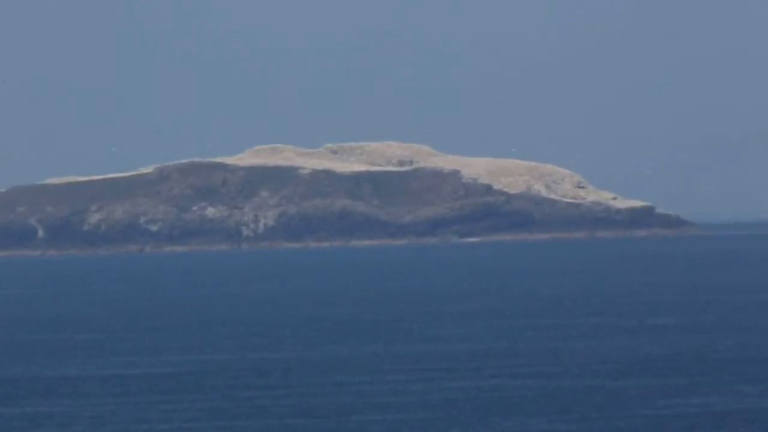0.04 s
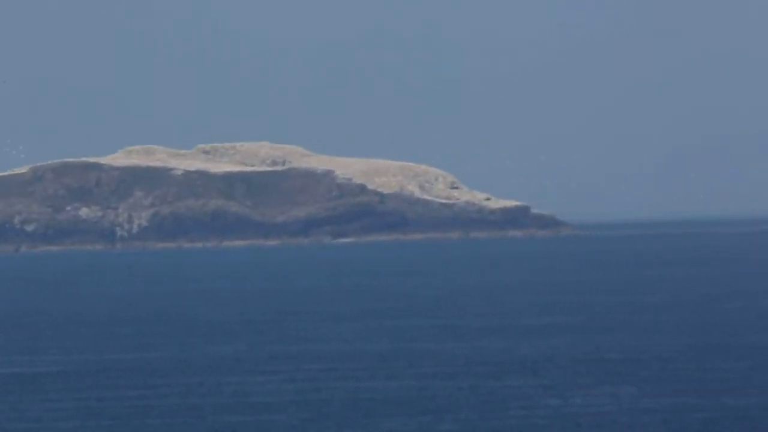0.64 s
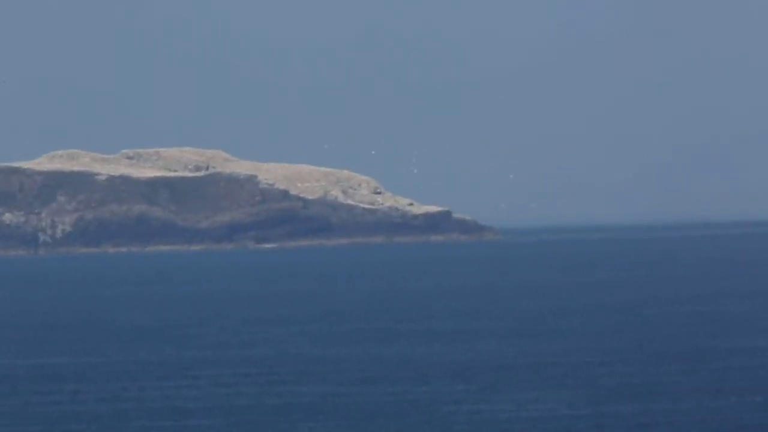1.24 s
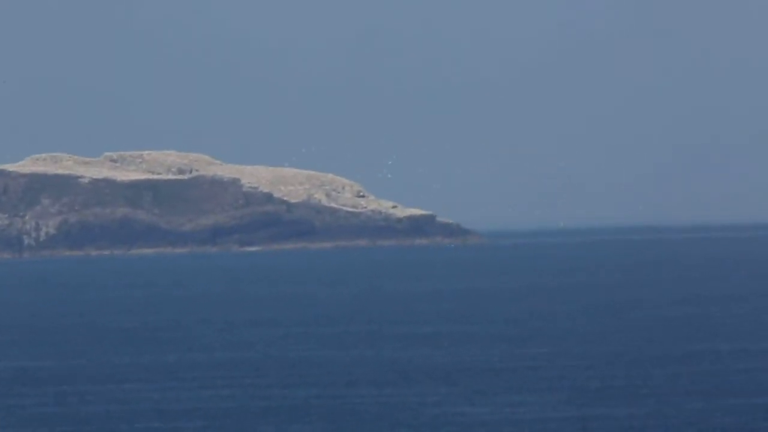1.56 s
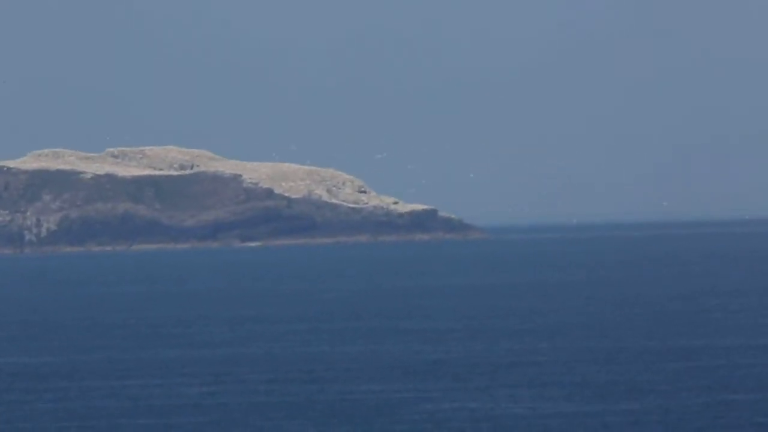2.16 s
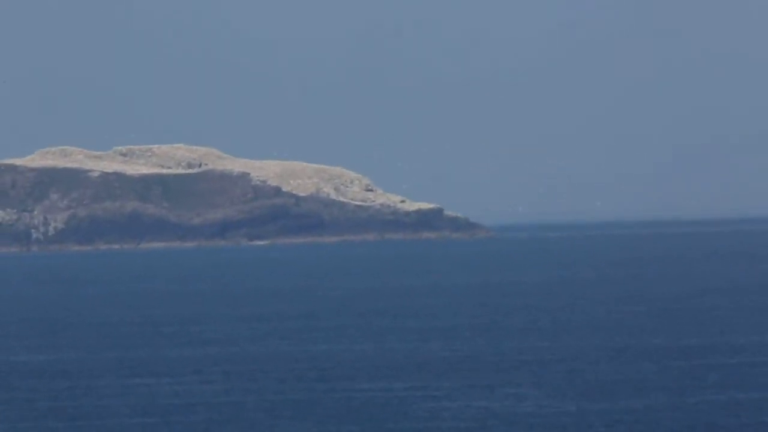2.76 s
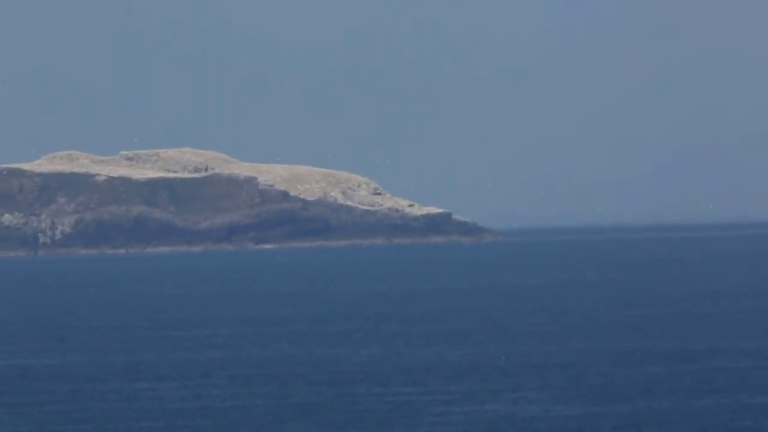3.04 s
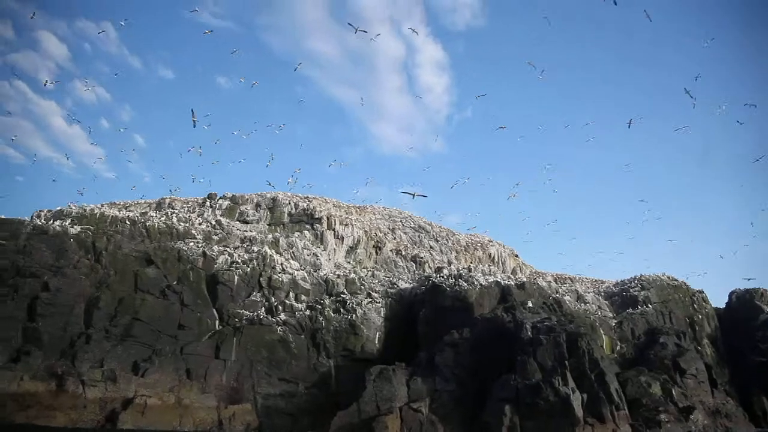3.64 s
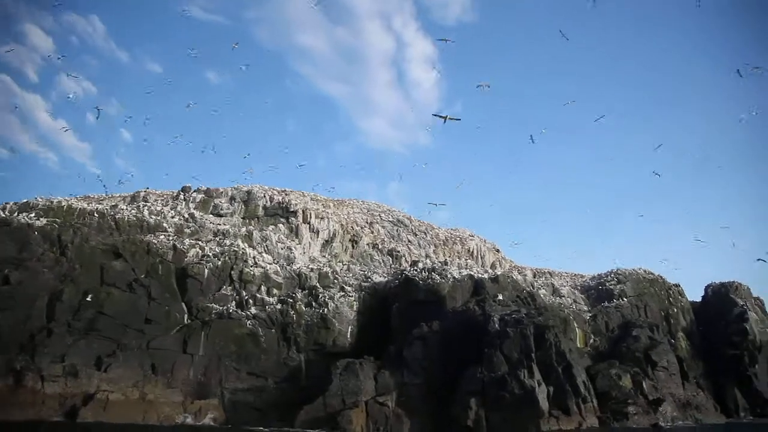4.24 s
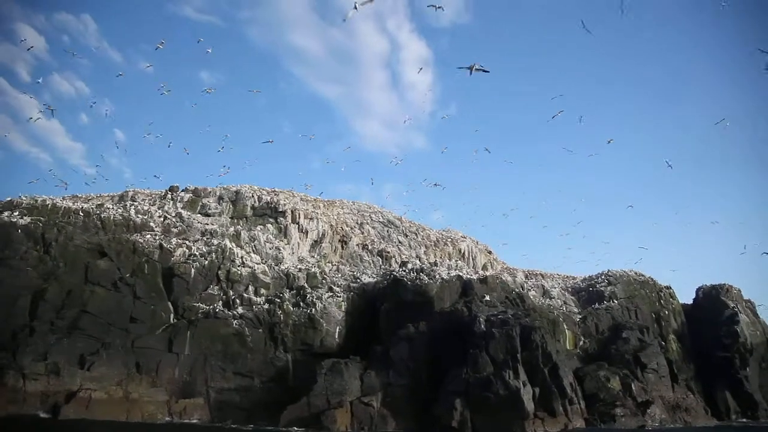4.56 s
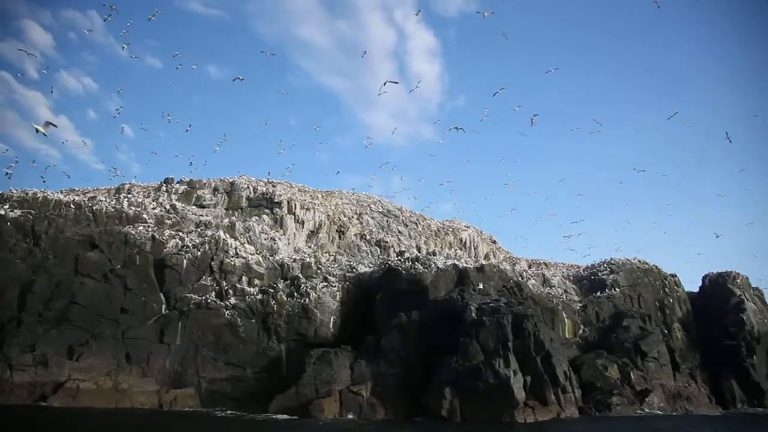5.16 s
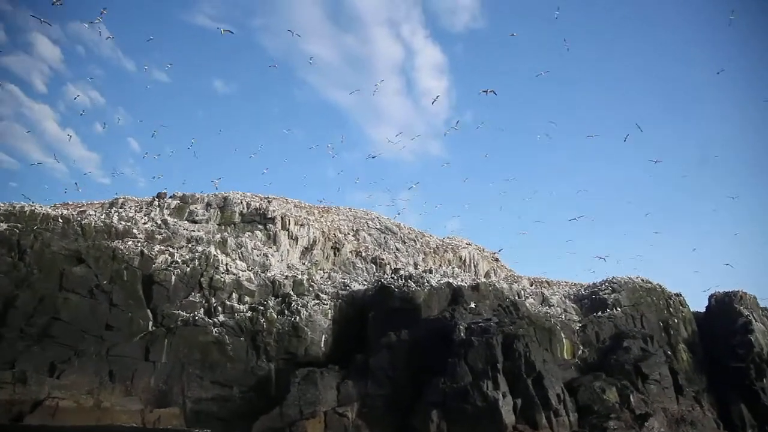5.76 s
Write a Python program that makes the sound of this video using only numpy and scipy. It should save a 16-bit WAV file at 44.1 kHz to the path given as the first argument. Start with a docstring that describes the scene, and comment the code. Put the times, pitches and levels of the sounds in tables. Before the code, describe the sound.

Wind buffets the microphone over distant sea, gulls and a songbird, then waves slap a boat beneath a cackling gannet colony.

```python
"""A gannet island, heard in mono from two places. On a quiet clifftop, gusts thump the microphone
over the far sea, a fading chorus of gulls and a small whistling songbird. After a short silence we
are in a boat under the colony. Waves boom on the hull, trapped air glugs, bubbles ring and foam
fizzes. Above it all a crowd of gannets cackles, each call a rattle of pulses ringing in a throat."""
import sys
import numpy as np
from scipy import signal
from scipy.fft import rfft, irfft, next_fast_len
from scipy.io import wavfile
from scipy.ndimage import uniform_filter1d

SR = 44100
rng = np.random.default_rng(int(sys.argv[2]) if len(sys.argv) > 2 else 0)


def output_pcm(signal):
    """Save a mono or channel-first signal as 16-bit PCM at the path in sys.argv[1].

    Samples are clipped to [-1, 1] before scaling.
    """
    pcm = np.clip(np.atleast_2d(signal).T, -1, 1) * 32767
    wavfile.write(sys.argv[1], SR, np.round(pcm).astype(np.int16))


N = 255339
TIME = np.arange(N) / SR
CLIFF_END_S, BOAT_START_S = 3.274, 3.352

# Levels in a table compare its rows; the functions may turn the whole layer up or down.
# Tone colours on the clifftop, from low to high: frequency_hz, level_db
FAR_SEA_SPECTRUM = [(20, -9), (52, 4), (85, -10.5), (150, -15.5), (370, -14), (560, -16.5), (700, -19.5),
                    (1200, -22.5), (1700, -25.5), (2100, -29), (5000, -32.5), (10000, -36), (15500, -41)]
RUSTLE_SPECTRUM = [(500, -2), (1700, 0), (3000, -8), (6000, -11), (11000, -24)]
WIND_SPECTRUM = [(20, -9), (45, 2), (75, 6.5), (165, -4), (230, -13.5), (300, -34), (400, -30), (500, -42),
                 (1000, -64)]
FLUTTER_SPECTRUM = [(180, -10), (250, -4), (310, -0.5), (380, -4), (470, -21), (800, -23.5), (1500, -46)]
# A faint, far tone: pitch_hz, width_hz, level_db
FAR_TONE = (1462, 45, -72.5)
# Soft rustles: start_s, length_s, level_db
RUSTLES = [(2.79, .13, -63), (2.98, .015, -62), (3.066, .02, -60)]
# How the gull chorus fades: time_s, level_db
CHORUS_LEVEL = [(0, -57), (.25, -55.5), (.6, -58.5), (1, -62), (1.4, -65), (1.9, -79.5), (3.27, -76)]
# Where the gulls' throats ring: pitch_hz, width_hz, level_db
GULL_THROATS = [(570, 170, -2.5), (1073, 380, 1), (1270, 200, -7), (1740, 260, -1), (2590, 100, -13)]
# The overtones of a gull's cry: pitch_multiple, level_db
GULL_HARMONICS = [(2, -4), (3, 0.5), (4, -16)]
# Single bending calls: start_s, length_s, start_hz, middle_hz, end_hz, level_db
GULL_CRIES = [(2.392, .1, 535, 615, 662, -62.5), (2.445, .1, 535, 584, 525, -62.5)]
YELPS = [(.17, 0.085, 1810, 1890, 1880, -58), (.58, 0.03, 2430, 2530, 2480, -62),
         (1.038, .035, 2280, 2460, 2330, -69)]
WHISTLES = [(0, .028, 4380, 4000, 4020, -62), (.06, .04, 4340, 4140, 4600, -62),
            (.137, .026, 7850, 7480, 7700, -60), (.162, .024, 7700, 8000, 8300, -73),
            (.315, 0.092, 5000, 4400, 4200, -62), (.42, .08, 4270, 4330, 4310, -78),
            (1.842, .055, 7150, 6800, 6970, -69), (1.895, .06, 7050, 7280, 7420, -75),
            (1.98, .07, 7500, 7620, 7700, -75)]
# Songbird trills: start_s, note_count, spacing_s, note_length_s, start_hz, middle_hz, end_hz, level_db
TRILLS = [(.54, 11, .0298, .009, 6700, 5700, 4900, -65.5), (.99, 8, .0305, .009, 6800, 5900, 5100, -67),
          (1.325, 8, .0607, .016, 5150, 5450, 5850, -66), (1.337, 8, .0607, .02, 5900, 5250, 4400, -63)]
# Gusts, rising and falling by 20 dB: peak_s, level_db, rise_s, fall_s
GUSTS = [(.02, -33, 0.041, 0.051), (.18, -38, 0.097, 0.25), (.44, -25, 0.19, 0.29),
         (1.19, -28, 0.091, 0.12), (1.35, -37.5, .07, 0.062), (1.62, -34.5, 0.063, 0.11),
         (2.11, -39.5, 0.075, 0.09), (2.24, -33, 0.089, 0.086), (2.46, -48.5, 0.073, 0.12)]
# Small swirls of air that thump the microphone: peak_s, level_db, pitch_hz
EDDIES = [(.168, -22.5, 127), (0.203, -20.5, 125), (.361, -20.5, 115), (0.418, -11, 153), (.461, -15, 217),
          (0.51, -23, 322), (0.521, -18.5, 189), (0.55, -30.5, 452), (.558, -19.5, 133), (0.599, -24, 173),
          (0.7, -23.5, 100), (.77, -24, 180), (0.836, -27.5, 85), (.935, -31, 96), (1.12, -27.5, 105),
          (1.173, -18, 158), (1.179, -26, 298), (1.19, -14.5, 150), (1.226, -24, 118), (1.524, -35.5, 186),
          (1.611, -29.5, 163), (2.217, -21, 113), (2.284, -20.5, 156), (2.345, -31.5, 96),
          (2.639, -37.5, 105)]

# Tone colours at the boat: frequency_hz, level_db
HULL_SPECTRUM = [(25, -32), (45, 3.5), (70, -7), (100, -1), (170, -5), (260, -6), (400, -10), (900, -78)]
WASH_SPECTRUM = [(120, -66), (280, -1), (500, 0), (800, -0.5), (1300, -1), (2200, -4), (3300, -9),
                 (5000, -25), (9000, -53)]
FOAM_SPECTRUM = [(1200, -15), (2400, -0.5), (3400, -1), (5000, -2.5), (6600, -4), (7500, -10.5),
                 (8800, -24), (10500, -34.5), (15000, -40)]
SPRAY_SPECTRUM = [(5000, 1), (8000, 14), (10500, -1.5), (13000, -12), (15500, -20)]
SHOWER_SPECTRUM = [(7000, -6), (9500, 2), (12500, -1), (14000, -13), (15500, -17)]
COLONY_SPECTRUM = [(400, -15), (800, -10), (1200, -3), (1600, -0.5), (2300, -3.5), (3200, -6), (4500, -33),
                   (7000, -28)]
# Waves meeting the hull: peak_s, level_db, length_s
WAVES = [(3.626, -25.5, .15), (3.732, -26.5, 0.28), (3.823, -30, 0.22), (3.927, -24, 0.24),
         (4.17, -27.5, 0.21), (4.455, -30.5, 0.29), (4.705, -24.5, 0.21), (5.09, -30.5, 0.76),
         (5.395, -31, 0.78), (5.563, -23, 0.16), (5.78, -36, .15)]
# Where the hull rings: pitch_hz, width_hz, level_db
HULL_RESONANCES = [(87.3, 10.7, 6.5), (141, 30, 5), (210, 22, -1)]
# How loud the foam, the spray and the gannet crowd are as time passes: time_s, level_db
FOAM_LEVEL = [(3.37, -35), (3.56, -32.5), (3.69, -31.5), (3.77, -36), (3.84, -33), (3.94, -37.5),
              (4.14, -33.5), (4.55, -34.5), (4.7, -33), (5.25, -37), (5.54, -35.5), (5.59, -41.5),
              (5.67, -38), (5.79, -41.5)]
SPRAY_LEVEL = [(3.37, -74), (3.64, -60), (3.93, -72), (4.1, -58), (4.7, -54), (4.95, -52.5), (5.15, -56),
               (5.5, -53.5), (5.62, -60), (5.79, -57)]
COLONY_LEVEL = [(3.37, -30), (3.95, -35), (4.15, -32), (4.5, -30.5), (4.85, -31), (5.1, -28), (5.55, -29.5),
                (5.79, -41)]
# Showers of spray and small splashes: start_s, length_s, level_db
SHOWERS = [(4.02, 0.091, -60), (4.115, 0.084, -55), (4.18, 0.16, -59), (4.34, .11, -59), (4.55, .42, -65)]
SPLASHES = [(3.815, 0.018, -30), (4.556, 0.013, -28), (4.632, .018, -30.5), (4.673, 0.049, -30.5),
            (4.85, 0.016, -30.5), (4.907, 0.018, -27), (5.506, 0.018, -30)]
# A thin ring within the foam: start_s, length_s, pitch_hz, width_hz, level_db
FOAM_RING = (4.98, 2.5, 6100, 220, -42.5)
# Drops falling close by: start_s, level_db
DROPS = [(4.0245, -24), (4.0464, -28), (4.6699, -35), (4.9134, -34), (5.433, -25), (5.4621, -30)]
# Air pockets glugging at the hull: start_s, glide_s, start_hz, end_hz, level_db
GLUGS = [(3.625, 0.04, 165, 200, -18.5), (3.711, 0.032, 564, 660, -16), (3.721, 0.078, 144, 165, -16.5),
         (3.759, 0.034, 374, 487, -18.5), (3.823, 0.012, 90, 70, -15), (3.892, 0.026, 408, 290, -16),
         (3.898, 0.035, 205, 104, -15), (4.106, .055, 153, 144, -18), (4.703, 0.041, 217, 184, -16),
         (5.085, 0.071, 169, 140, -18), (5.55, 0.04, 240.5, 195, -13), (5.565, 0.083, 152.6, 127, -15)]
# Calls of the nearer gannets: start_s, length_s, pitch_hz, throat_hz, level_db
CACKLES = [(3.53, 0.054, 482, 3000, -41), (3.885, 0.047, 470, 3270, -38), (4.181, 0.025, 530, 1760, -28.5),
           (4.212, 0.037, 330.7, 2130, -26.5), (4.328, 0.067, 474, 3100, -33),
           (4.662, 0.034, 536, 1590, -30), (4.992, 0.052, 476, 2300, -36.5), (5.072, 0.03, 500, 2160, -31),
           (5.114, 0.063, 487, 2280, -32.5), (5.321, 0.055, 438, 1920, -36.5), (5.33, .08, 501, 3950, -42),
           (5.391, 0.031, 513, 1620, -26.5), (5.471, 0.024, 463.4, 1420, -28.5),
           (5.483, 0.021, 437, 2080, -28), (5.514, 0.015, 508, 2700, -36), (5.52, 0.052, 536, 2070, -35.5)]


def from_db(db):
    """Turn decibels into a gain, the number a sound is multiplied by."""
    return 10 ** (np.asarray(db) / 20)


def unit_power(x):
    """Scale a sound so that its average power is 1."""
    return x / np.sqrt(np.mean(x ** 2) + 1e-20)


def even_out(x):
    """Hold the power near 1 over each third of a second, so only quick changes stay."""
    power = uniform_filter1d(x ** 2, size=SR // 3)
    return x / np.sqrt(np.abs(power) + 1e-4 * power.mean())


def add(out, start_s, sound):
    """Mix a sound into out, cutting off whatever does not fit."""
    at = int(start_s * SR)
    part = sound[max(-at, 0):max(N - at, 0)]
    out[max(at, 0):max(at, 0) + len(part)] += part


def level_curve(rows):
    """Join (time_s, level_db) points into a gain for every sample."""
    times, levels = np.transpose(rows)
    return from_db(np.interp(TIME, times, levels))


def swell_at(peak_s, rise_s, fall_s):
    """A gain that climbs 20 dB in rise_s, reaches 1, then sinks 20 dB in fall_s."""
    away = np.maximum((peak_s - TIME) / rise_s, (TIME - peak_s) / fall_s)
    return from_db(-20 * np.minimum(away, 10))


def bursts(rows):
    """A gain with one rounded bump for each (start_s, length_s, level_db)."""
    out = np.zeros(N)
    for start_s, length_s, db in rows:
        add(out, start_s, from_db(db) * np.sqrt(np.hanning(int(length_s * SR))))
    return out


def colour(x, spectrum):
    """Shape a sound's lows and highs, fading past the table's ends; the power comes out as 1."""
    hz, db = np.transpose(spectrum)
    size = next_fast_len(N)
    log_hz = np.log(np.arange(size // 2 + 1) * SR / size + 1)
    beyond = np.abs(log_hz - np.clip(log_hz, np.log(hz[0]), np.log(hz[-1])))
    gain = from_db(np.interp(log_hz, np.log(hz), db) - 20 * beyond)
    return unit_power(irfft(rfft(x, size) * gain, size)[:N])


def noise(spectrum):
    """Steady noise with the given tone colour."""
    return colour(rng.standard_normal(N), spectrum)


def drift(rate_hz):
    """A smooth random wander, about 1 in size; a higher rate wanders faster."""
    step, warm_up = 40, 2000   # one point every 40 samples; the first points are dropped
    memory = np.exp(-2 * step * np.pi * rate_hz / SR)
    kicks = rng.standard_normal(N // step + warm_up + 2)
    slow = signal.lfilter([1], [1, -2 * memory, memory * memory], kicks)[warm_up:]
    return np.interp(np.arange(N) / step, np.arange(len(slow)), unit_power(slow))


def resonate(x, hz, width_hz):
    """Make a sound ring at one pitch; a narrower width rings longer."""
    decay = np.exp(-np.pi * width_hz / SR)
    feed = np.array([1, 0, -1]) * (1 - decay * decay) / 2
    feedback = [1, -2 * decay * np.cos(2 * np.pi * hz / SR), decay * decay]
    return signal.lfilter(feed, feedback, x + 1e-18)


def clicks(per_s, spread_db):
    """Random clicks, most small and a few large."""
    sizes = from_db(spread_db * np.minimum(rng.exponential(1, N), 4)) * rng.choice([-1, 1], N)
    return sizes * (rng.random(N) < per_s / SR)


def glide(length_s, start_hz, middle_hz, end_hz):
    """The phase and the swell of a note whose pitch bends through three points."""
    progress = np.linspace(0, 1, max(int(length_s * SR), 8))
    bend = np.polyfit([0, .5, 1], [start_hz, middle_hz, end_hz], 2)
    hz = np.polyval(bend, progress)
    return 2 * np.pi * np.cumsum(hz) / SR, np.sqrt(np.abs(np.sin(np.pi * progress)))


def pure_notes(rows):
    """Play each row as one bending sine tone."""
    out = np.zeros(N)
    for start_s, *shape, db in rows:
        phase, swell = glide(*shape)
        add(out, start_s, from_db(db) * swell * np.sin(phase))
    return out


def rock_echoes(x, fade_s, echo_db):
    """Rock faces add a thin tail of echoes that sinks 60 dB in fade_s."""
    tail = rng.standard_normal(SR) * (rng.random(SR) < .02) * from_db(-60 * TIME[:SR] / fade_s)
    return x + from_db(echo_db) * signal.fftconvolve(x, tail / np.linalg.norm(tail))[:N]


def far_sea(level_db=-54.5):
    """Distant waves blur into a steady, low rush."""
    return from_db(level_db) * noise(FAR_SEA_SPECTRUM)


def far_tone():
    """A narrow band of noise makes a thin, unsteady tone in the background."""
    hz, width_hz, db = FAR_TONE
    return from_db(db) * unit_power(resonate(rng.standard_normal(N), hz, width_hz))


def rustle():
    """Short bursts of tiny clicks make a faint, grainy rustle."""
    return bursts(RUSTLES) * colour(clicks(1500, spread_db=3), RUSTLE_SPECTRUM)


def far_yelps(hoarse_db=4):
    """A few far yelps, made hoarse by a fast flicker in level."""
    flicker = unit_power(from_db(hoarse_db * drift(150)) * np.cos(drift(60)))
    return rock_echoes(pure_notes(YELPS) * flicker, fade_s=.5, echo_db=-10)


def gull_chorus(count=150, blur_db=11, waver_db=-.3):
    """Many arching cries, blurred by distance, share a few throat resonances."""
    flock = np.zeros(N)
    for when, length, pitch in rng.random((count, 3)):
        hz = 440 + 200 * pitch
        phase, swell = glide(.15 + .25 * length, .92 * hz, hz, .93 * hz)
        cry = swell * sum(np.sin(k * phase) for k in range(1, 6))
        add(flock, (CLIFF_END_S + .5) * when - .5, cry)
    flock = unit_power(flock) + from_db(blur_db) * rng.standard_normal(N)
    throats = np.zeros(N)
    for hz, width_hz, db in GULL_THROATS:
        ringing = resonate(resonate(flock, hz, width_hz), hz, width_hz)
        throats += from_db(db + waver_db * drift(1.2)) * ringing
    return level_curve(CHORUS_LEVEL) * even_out(rock_echoes(throats, fade_s=1, echo_db=-10))


def gull_cries():
    """Two far cries stand out, each a bending stack of overtones."""
    cries = np.zeros(N)
    for start_s, *shape, cry_db in GULL_CRIES:
        phase, swell = glide(*shape)
        overtones = sum(from_db(cry_db + db) * np.sin(k * phase) for k, db in GULL_HARMONICS)
        add(cries, start_s, swell * overtones)
    return rock_echoes(cries, fade_s=.58, echo_db=-10)


def songbird(uneven_db=1.3, flutter_db=3.3):
    """A small bird sings pure whistles, and trills that repeat one sliding note."""
    notes = list(WHISTLES)
    for start_s, count, spacing_s, *shape, db in TRILLS:
        for k in range(round(count)):
            notes.append((start_s + k * spacing_s, *shape, db + uneven_db * rng.normal()))
    song = pure_notes(notes) * from_db(flutter_db * drift(50))
    return rock_echoes(song, fade_s=.52, echo_db=-6)


def wind(rumble_db=-1, flutter_db=-14, eddy_db=-1, lumpy_db=3, puff_db=-12.5, puff_s=.0089):
    """Lumpy gusts hit the microphone; each eddy is one swing of pressure inside a short puff."""
    power = sum((from_db(db) * swell_at(peak_s, rise_s, fall_s)) ** 2
                for peak_s, db, rise_s, fall_s in GUSTS)
    power *= from_db(lumpy_db * np.clip(drift(25), -2, 1)) ** 2
    lead_s = .05   # each eddy starts this long before its peak
    t = TIME[:SR // 10] - lead_s
    thumps = np.zeros(N)
    for peak_s, db, hz in EDDIES:
        phase = 2 * np.pi * hz * t
        swing = np.cos(phase + rng.uniform(0, 2 * np.pi)) / np.cosh(np.clip(phase / 1.75, -20, 20))
        add(thumps, peak_s - lead_s, from_db(db + eddy_db) * swing)
        add(power, peak_s - lead_s, from_db(db + puff_db) ** 2 * np.exp(-(t / puff_s) ** 2))
    gust = np.sqrt(power)
    rumble = from_db(rumble_db) * noise(WIND_SPECTRUM)
    brightness = np.sqrt(gust / gust.max())   # strong gusts sound brighter
    flutter = from_db(flutter_db) * brightness * noise(FLUTTER_SPECTRUM)
    return thumps + gust * (rumble + flutter)


def wave_strength(rest_db=-36, rise_share=.61):
    """How hard the waves push: 1 in the lulls, more as each one meets the hull."""
    power = sum((from_db(db) * swell_at(peak_s, rise_share * length_s, (1 - rise_share) * length_s)) ** 2
                for peak_s, db, length_s in WAVES)
    return np.sqrt(1 + power / from_db(rest_db) ** 2)


def hull_boom(waves, rest_db=-36):
    """Each wave pushes on the hull, which booms at its own low pitches."""
    push = noise(HULL_SPECTRUM)
    ringing = sum(from_db(db) * resonate(push, hz, width_hz) for hz, width_hz, db in HULL_RESONANCES)
    return from_db(rest_db) * waves * unit_power(push + ringing)


def wash(waves, rest_db=-35, bubble_db=-3, follow=.32):
    """Rushing water, full of ringing bubbles, swells gently with the waves."""
    bubbles = sum(resonate(clicks(35, spread_db=4), hz, width_hz=hz / 16)
                  for hz in np.geomspace(350, 4500, num=26))
    churn = noise(WASH_SPECTRUM) + from_db(bubble_db) * colour(bubbles, WASH_SPECTRUM)
    return from_db(rest_db) * waves ** follow * churn


def foam_and_spray(surge_db=.8, spray_db=2):
    """Foam and spray burst as thousands of fine clicks a second, with brighter showers on top."""
    fizz = colour(clicks(9000, spread_db=1.5), FOAM_SPECTRUM) * from_db(surge_db * drift(53))
    mist = from_db(spray_db) * colour(clicks(5000, spread_db=2.5), SPRAY_SPECTRUM)
    showers = bursts(SHOWERS) * colour(clicks(6000, spread_db=2.5), SHOWER_SPECTRUM)
    return level_curve(FOAM_LEVEL) * fizz + level_curve(SPRAY_LEVEL) * mist + showers


def foam_ring():
    """A thin, high ring swells within the hiss near the end."""
    start_s, length_s, hz, width_hz, db = FOAM_RING
    ring = unit_power(resonate(rng.standard_normal(N), hz, width_hz))
    return bursts([(start_s, length_s, db)]) * ring


def drops_and_splashes(drop_db=-6, fade_s=.016, pitch_hz=7500, width_hz=4500, splash_db=-1):
    """Each drop is a short, bright spatter; each splash is a burst of foam."""
    spatter = np.zeros(N)
    t = TIME[:SR // 20]
    for start_s, db in DROPS:
        add(spatter, start_s, from_db(db + drop_db - 60 * t / fade_s) * rng.standard_normal(len(t)))
    spatter = resonate(resonate(spatter, pitch_hz, width_hz), pitch_hz, 2 * width_hz)
    return spatter + from_db(splash_db) * bursts(SPLASHES) * noise(FOAM_SPECTRUM)


def glugs(gain_db=-2.7, rise_share=.23):
    """Trapped air rings briefly, its pitch sliding as the pocket changes shape."""
    out = np.zeros(N)
    for start_s, glide_s, start_hz, end_hz, db in GLUGS:
        progress = TIME[:int(2 * glide_s * SR)] / glide_s
        hz = np.interp(progress, [0, 1], [start_hz, end_hz])
        phase = 2 * np.pi * np.cumsum(hz) / SR
        swell = (progress / rise_share * np.exp(1 - progress / rise_share)) ** 2
        add(out, start_s, from_db(db + gain_db) * swell * np.sin(phase))
    return out


def gannet_call(length_s, pitch_hz, throat_hz, rattle_hz=78, width_hz=850):
    """One 'arr': uneven, rattling pulses with a little rasp ring in the bird's throat."""
    wobble, rasp = rng.standard_normal((2, SR // 4))
    t = TIME[:int(min(length_s, .2) * SR)]
    arch = np.abs(np.sin(np.pi * t / t[-1]))
    wobble = unit_power(uniform_filter1d(wobble, size=128))[:len(t)]
    hz = pitch_hz * (.985 + .02 * arch + .016 * wobble)
    pulses = np.diff(np.floor(np.cumsum(hz) / SR), prepend=0)   # one click per cycle
    rattle = 1 + .55 * np.sin(2 * np.pi * (rattle_hz * t + rng.random()))
    buzz = (unit_power(pulses) + .25 * rasp[:len(t)]) * rattle
    voice = resonate(resonate(buzz, throat_hz, width_hz), throat_hz, 2 * width_hz)
    return unit_power(voice) * np.sqrt(arch)


def gannet_crowd(gain_db=-5.5, count=36):
    """Birds all over the rock each call four times, at about five calls a second."""
    crowd = np.zeros(N)
    for bird, (pitch, throat, pace, distance) in enumerate(rng.random((count, 4))):
        first_s = BOAT_START_S - .5 + 3 * (bird + rng.random()) / count
        spacing_s = .15 + .1 * pace
        pitch_hz, throat_hz = 340 + 220 * pitch, 1050 * 2 ** (1.34 * throat)
        for k in range(4):
            call = gannet_call(rng.uniform(.055, .11), pitch_hz * rng.uniform(1, 1.04), throat_hz)
            add(crowd, first_s + k * spacing_s, from_db(-8 * distance) * call)
    crowd = colour(rock_echoes(crowd, fade_s=.7, echo_db=-6), COLONY_SPECTRUM)
    return from_db(gain_db) * level_curve(COLONY_LEVEL) * even_out(crowd)


def near_gannets(gain_db=.8):
    """A few close birds cackle over the crowd, with less echo."""
    calls = np.zeros(N)
    for start_s, length_s, pitch_hz, throat_hz, db in CACKLES:
        add(calls, start_s, from_db(db + gain_db) * gannet_call(length_s, pitch_hz, throat_hz))
    return rock_echoes(calls, fade_s=.4, echo_db=-12)


def scene(fade_s=.002):
    """The clifftop, a moment of silence, then the boat; both channels are the same."""
    clifftop = far_sea() + wind() + gull_chorus() + gull_cries() + far_tone()
    clifftop += songbird() + far_yelps() + rustle()
    waves = wave_strength()
    water = hull_boom(waves) + wash(waves) + foam_and_spray()
    water += glugs() + drops_and_splashes() + foam_ring()
    boat = water + gannet_crowd() + near_gannets()
    fade_out = np.clip((CLIFF_END_S - TIME) / fade_s, 0, 1)
    fade_in = np.clip((TIME - BOAT_START_S) / fade_s, 0, 1)
    mono = clifftop * fade_out + boat * fade_in
    return np.array([mono, mono])


def record(dry, cutoff_hz=15700):
    """A steep filter removes the very highest treble."""
    return signal.sosfilt(signal.ellip(12, .1, 90, cutoff_hz, fs=SR, output="sos"), dry)


dry = scene()
out = record(dry)
output_pcm(out)
```